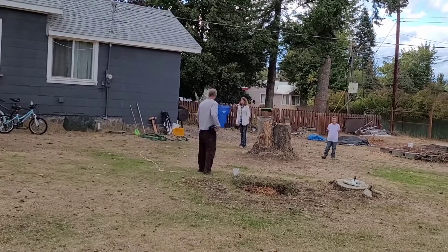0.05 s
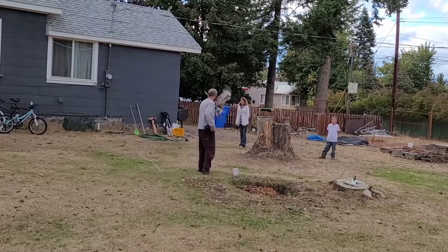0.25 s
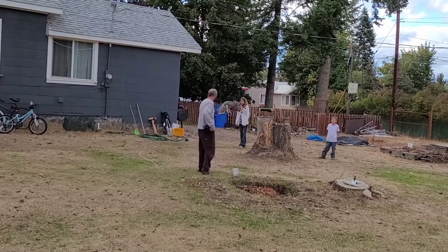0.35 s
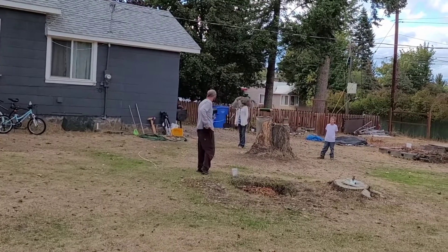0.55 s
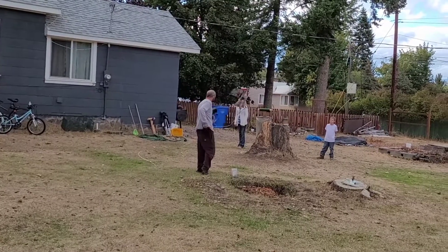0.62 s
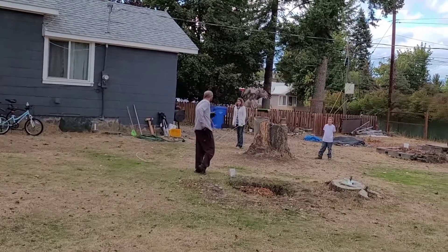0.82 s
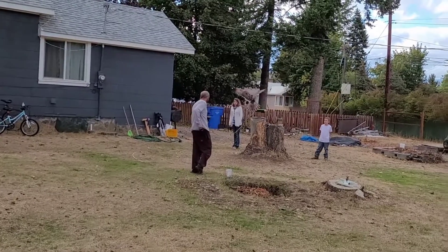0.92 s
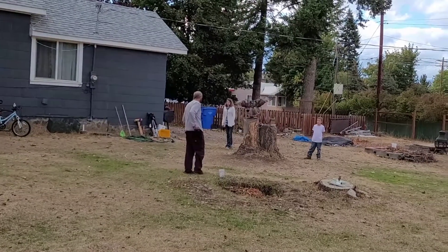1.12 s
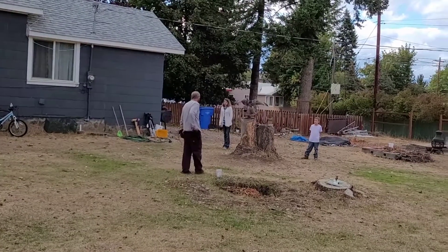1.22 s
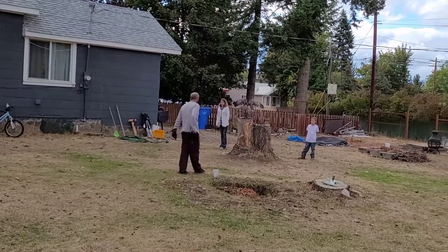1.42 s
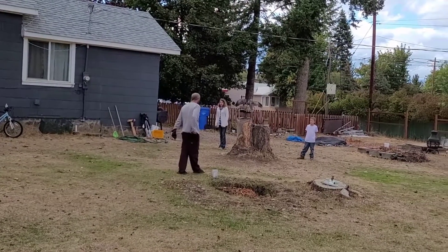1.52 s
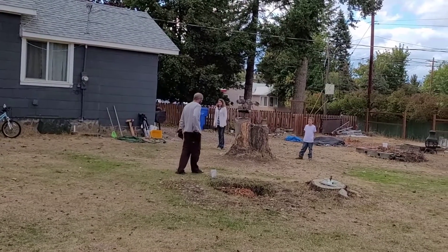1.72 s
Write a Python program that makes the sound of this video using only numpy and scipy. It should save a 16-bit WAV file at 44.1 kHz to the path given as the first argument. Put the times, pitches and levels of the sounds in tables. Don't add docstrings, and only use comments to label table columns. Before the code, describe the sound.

A small jingle bell shaken in the hand outdoors, with one hollow wooden knock near the end

```python
import sys
import numpy as np
from scipy import signal
from scipy.fft import rfft, irfft
from scipy.io import wavfile

SR = 44100
rng = np.random.default_rng(int(sys.argv[2]) if len(sys.argv) > 2 else 0)


def natural_amplitude(level_db):
    exponent = np.asarray(level_db, float) / 20
    return 10 ** exponent


def int16_out(signal):
    q = np.round(np.clip(np.atleast_2d(signal).T, -1, 1) * 32767)
    wavfile.write(sys.argv[1], SR, q.astype(np.int16))


N = 77175

HALVES = np.array([[.5], [-.5]])
BELL_HZ, BELL_LEFT_DB = 2830, 5
RISE_S = 0.0032


def slot_tone():
    # start in seconds, level in dB, ring length in seconds, pitch in Hz, left-right phase in rad.
    early = [(0.2062, -35.6, 0.01, 2870, 0.2), (0.2258, -33.0, 0.0053, 2930, 0.1),
             (0.2595, -29.0, 0.0064, 2850, -0.8), (0.267, -33.3, 0.0066, 2840, -0.4),
             (0.2792, -30.2, 0.0051, 2830, 0.2), (0.2933, -30.4, 0.0039, 2830, -1.7),
             (0.2981, -30.3, 0.0081, 2800, -0.6), (0.3121, -30.2, 0.0054, 2820, 0.1),
             (0.3192, -34.0, 0.0075, 2820, -0.5), (0.3393, -34.1, 0.003, 2890, -0.3),
             (0.3593, -33.8, 0.0056, 2850, -1.9), (0.3707, -30.6, 0.0058, 2850, -2.4),
             (0.3829, -31.3, 0.0028, 2910, -0.0), (0.3915, -28.8, 0.0051, 2830, -2.8),
             (0.407, -31.2, 0.0027, 2890, -3.0), (0.4164, -23.3, 0.0028, 2900, -2.3),
             (0.4207, -22.1, 0.0073, 2870, -0.3), (0.4317, -24.9, 0.0053, 2830, -0.2),
             (0.4538, -22.7, 0.0061, 2830, 1.5), (0.4616, -26.7, 0.0082, 2840, -2.1),
             (0.4773, -26.1, 0.0052, 2820, 0.1), (0.4957, -32.0, 0.0079, 2800, -0.7),
             (0.5095, -28.9, 0.0058, 2850, -2.9), (0.5313, -33.1, 0.0039, 2860, -3.1),
             (0.5856, -29.9, 0.0047, 2820, -0.5), (0.5921, -23.4, 0.0093, 2810, -0.3),
             (0.6073, -26.4, 0.0042, 2830, -0.2), (0.6164, -28.2, 0.0037, 2910, -1.9),
             (0.6228, -24.2, 0.004, 2890, 3.0), (0.6284, -28.6, 0.0076, 2820, 1.5),
             (0.6377, -26.4, 0.0043, 2890, 2.9), (0.6626, -29.1, 0.0076, 2790, -0.4),
             (0.6882, -30, 0.005, 2800, -0.2), (0.6933, -28.7, 0.0029, 2820, 2.5),
             (0.7017, -28.5, 0.0066, 2820, -0.9)]
    # [s, dB, s, Hz, rad].
    late = [(0.7104, -32.9, 0.0032, 2820, 2.2), (0.7185, -28.8, 0.0057, 2830, -3.0),
            (0.7326, -29.7, 0.0056, 2860, 2.8), (0.7721, -27.0, 0.0048, 2780, -0.4),
            (0.7827, -32.1, 0.0086, 2760, -0.8), (0.7922, -31.9, 0.0064, 2850, -3.1),
            (0.8001, -25.9, 0.0057, 2780, 2.7), (0.8081, -29.8, 0.005, 2890, -3.0),
            (0.8334, -29.9, 0.0047, 2860, 2.8), (0.8427, -32.9, 0.0038, 2900, -3.1),
            (0.9274, -34.7, 0.0052, 2870, 0.3), (0.9537, -27.1, 0.009, 2820, 1.3),
            (0.9736, -32.6, 0.0056, 2780, 1.7), (0.9809, -28.9, 0.007, 2810, 2.5),
            (0.9994, -28.9, 0.0076, 2820, -0.2), (1.017, -27.6, 0.0106, 2780, -0.9),
            (1.0444, -27.6, 0.0161, 2810, 2.8), (1.1019, -32.6, 0.0057, 2830, -0.3),
            (1.1273, -25.7, 0.0112, 2840, 1.3), (1.151, -31, 0.011, 2830, 0.9),
            (1.1722, -32.6, 0.0099, 2810, -0.0), (1.1973, -29.7, 0.0074, 2840, 2.4),
            (1.2305, -29.1, 0.0075, 2850, -0.4), (1.2493, -22.3, 0.0066, 2830, -0.4),
            (1.2753, -30.8, 0.0059, 2830, 3.1), (1.3317, -33.4, 0.0078, 2820, -0.3),
            (1.3486, -24.5, 0.0087, 2830, -0.3), (1.3596, -32.6, 0.0063, 2820, -1.0),
            (1.3751, -31.3, 0.0042, 2860, -3.1), (1.4248, -30.0, 0.011, 2870, -0.5),
            (1.4513, -36.5, 0.0083, 2880, 0.5), (1.4978, -35.7, 0.0059, 2850, -0.7),
            (1.5505, -38.9, 0.0045, 2850, -0.3), (1.5671, -40.3, 0.0042, 2870, -0.3),
            (1.6638, -45, 0.005, 2840, 0)]
    # [s, dB, s, Hz, rad].
    faint = [(0.446, -27.5, 0.0084, 2860, 0.2), (0.547, -39.5, 0.0045, 2980, 0.24),
             (1.414, -41, 0.021, 2863, 0.2), (1.528, -44.5, 0.0058, 2857, 0.29),
             (1.6331, -42, 0.005, 2814, 0.23), (1.6548, -43, 0.0048, 2874, 0.18)]
    twin_hz, twin_spread_hz, twin_db, twin_t60_s = 200, 210, -8.5, 0.025
    sag_db, damp_t60_s = -4, 0.03
    strikes = early + late + faint
    out, t = np.zeros((2, N)), np.arange(3000) / SR
    luck = rng.uniform(-0.92, 1, (len(strikes), 4))
    for (s, db, length, hz, turn), (phase, pan, apart, twin_phase) in zip(strikes, luck):
        hold = length * 0.8
        swell = np.sin(np.pi / 2 * np.minimum(t / RISE_S, 1)) ** 2
        damping_db = 60 * np.maximum(t - hold - RISE_S / 2, 0) / damp_t60_s
        shape = swell * natural_amplitude(sag_db * t / hold - damping_db)
        facing = turn * HALVES
        twin_mode = (hz + twin_hz + twin_spread_hz * apart, twin_db, twin_t60_s)
        twin = ring([twin_mode], t, np.pi * twin_phase - facing)
        tone = np.sin(2 * np.pi * hz * t + np.pi * phase + facing) + twin
        add(out, s - RISE_S / 2, natural_amplitude(db + 1.0) * sides(BELL_LEFT_DB + 4.4 * pan) * shape * tone)
    return out


def rolling():
    # frequency in Hz, level in dB.
    clatter = [(3400, 16), (5000, -17.5), (7500, -4), (9000, -49), (12500, 0.5), (15500, -41.5)]
    roll_db, roll_width_hz, roll_per_s = -4, 170, 400
    clatter_db, clatter_follow = -73, 0.58
    taps = clicks(roll_per_s, spread_db=0.0)
    hum = resonate(taps, BELL_HZ * swing(0.97), roll_width_hz)
    tone = natural_amplitude(roll_db + effort(axis=1)) * sides(BELL_LEFT_DB) * hum
    grit = signal.lfilter([1], [1, -0.98], abs(taps)) * 0.057 + 1
    noise = grit * rng.standard_normal((2, N))
    dry_noise = evened(colour(noise, lambda hz: read([(500, -58.5)] + clatter, hz)))
    return tone + natural_amplitude(clatter_db + clatter_follow * (effort(axis=2) + 86)) * dry_noise


def shell():
    # frequency in Hz, level when tumbled in dB, level when struck in dB, left-right phase in rad.
    shell_modes = [
        (5980, 7, -3, -2.4),
        (6150, 0, -1, -1.5),
        (9980, 5, -6.5, 1.45),
        (10870, -2, -4, 1.5),
        (15450, -14, -26, 0),
    ]
    # start in seconds, level in dB.
    rim_hits = [(0.227, -70.5), (0.448, -76), (0.606, -77), (0.7689, -76.5), (1.071, -76.5), (1.2593, -69),
                (1.2888, -65.5)]
    # start in seconds, level in dB.
    top_hits = [(.603, -71), (.666, -74), (.769, -66)]
    tumble_per_s, width_hz, t60_s, hit_spread_db = 110, 95, 0.5, 6
    out, t = np.zeros((2, N)), np.arange(SR // 2) / SR
    drift = swing(0.3)
    luck = rng.uniform(-1, 1, (len(rim_hits), len(shell_modes), 3))
    for k, (hz, tumbled_db, struck_db, lag) in enumerate(shell_modes):
        taps = clicks(tumble_per_s, spread_db=3.5)
        flicker = resonate(taps, hz * drift, width_hz * hz / 8000, lag * HALVES)
        out += natural_amplitude(tumbled_db + effort(axis=2)) * flicker
        for (s, db), (size, phase, tune) in zip(rim_hits, luck[:, k]):
            hit_hz = hz * drift[round(s * SR)] * (1 + 0.0015 * tune)
            mode = (hit_hz, db + struck_db + hit_spread_db * size, t60_s)
            add(out, s, np.minimum(t / 0.003, 1) * ring([mode], t, np.pi * phase + lag * HALVES))
    top_hz = shell_modes[-1][0]
    for s, db in top_hits:
        add(out, s, np.minimum(t / RISE_S, 1) * ring([(top_hz, db, 0.15)], t)[None])
    return out


def ticks():
    # start in seconds, level in dB.
    tick_times = [(0.1608, -54.5), (0.1766, -60), (0.1989, -59.5), (0.3787, -56.5), (0.4195, -56),
                  (0.5835, -52.5), (0.5913, -54.5), (1.228, -56.5), (1.2486, -47.5), (1.3475, -54.5)]
    t60_s, tilt_db = 0.022, -16
    out, t = np.zeros((2, N)), np.arange(1024) / SR
    for s, db in tick_times:
        noise = rng.standard_normal((3, 1024))
        noise = noise[:1] + 1.8 * noise[1:]
        snap = evened(colour(noise, lambda hz: tilt_db * abs(np.log2((hz + 50) / 3500))))
        add(out, s, np.minimum(t / 0.0015, 1) * natural_amplitude(db + 2.5 - 60 * t / t60_s) * snap)
    return out


def knock():
    # start in seconds, level in dB, brightness in dB, left-right difference in dB.
    knocks = [
        (1.16, -19, -1, 2.5),
        (1.167, -37.5, -4.5, -7.5),
        (1.1864, -34.5, -0.5, -3.5),
        (1.203, -36.5, 8.5, 7),
        (1.2363, -44, -11, 7),
        (1.2909, -45, 4, -6.5),
    ]
    # frequency in Hz, level in dB, T60 in seconds.
    wood = [
        (115.6, -25.5, 0.12),
        (826, -17.5, 0.024),
        (1313, -1.5, 0.025),
        (1900, -6, 0.0064),
    ]
    # frequency in Hz, level in dB, T60 in seconds.
    wood_crack = [(3227, -2.5, 0.011), (4100, -26, 0.014), (5070, -20, 0.0085), (6896, -33.5, 0.019),
                  (9960, -25.5, 0.013)]
    tail_db, tail_t60_s, tail_hz, tail_width_hz = -44, 0.62, 1290, 240
    out, t = np.zeros((2, N)), np.arange(SR // 3) / SR
    for s, db, bright_db, pan_db in knocks:
        crack = ring(wood_crack, t) + natural_amplitude(-23.5 - 60 * t / 0.032) * rng.standard_normal((2, len(t)))
        blow = ring(wood, t, 0.37 * HALVES) + natural_amplitude(bright_db) * crack
        add(out, s, np.minimum(t / 0.0013, 1) ** 2 * natural_amplitude(db + 4.0) * sides(pan_db) * blow)
    tail = resonate(rng.standard_normal((2, len(t))), tail_hz, tail_width_hz)
    add(out, knocks[0][0], np.minimum(t / 0.023, 1) * natural_amplitude(tail_db - 60 * t / tail_t60_s) * tail)
    return out


def scuffs():
    # start in seconds, length in seconds, level in dB, left-right difference in dB, brightness in dB per octave.
    rubs = [(0.051, 0.00503, -71, -8, 6), (0.0888, 0.0041, -53, -19, 5.5), (0.0913, 0.015, -47, -8.5, 0),
            (0.152, 0.039, -63, 6, 1), (0.364, 0.028, -59, 2.5, -11), (0.57, 0.074, -69.5, -10, 13.5),
            (1.066, 0.0052, -70, -13.5, 30.5), (1.223, 0.031, -66, -11.5, 6), (1.611, 0.069, -69.5, 9, 1.5),
            (1.695, 0.075, -63, 7, -0.5)]
    # frequency in Hz, level in dB.
    cloth = [(600, -36), (1100, -5), (2290, 5.5), (3900, -3.5), (5500, -30), (7100, -17.5), (12000, -57.5)]
    out = np.zeros((2, N))
    for s, length, db, pan_db, tilt_db in rubs:
        grit = rng.standard_normal((3, 4096)) * natural_amplitude(2 * rng.exponential(1, 4096))
        grit = grit[:1] + 0.31 * grit[1:]
        grit = evened(colour(grit, lambda hz: read(cloth, hz) + tilt_db * np.log2((hz + 50) / 2500)))
        u = np.minimum(np.arange(4096) / SR / length, 1)
        add(out, s, natural_amplitude(db) * sides(pan_db) * np.sin(np.pi * u) ** 0.59 * (u < 1) * grit)
    return out


def thumps():
    # start in seconds, level in dB, pitch in Hz.
    bumps = [
        (0.366, -48, 190),
        (.37, -58, 680),
        (0.403, -45, 195),
    ]
    length_s = 0.023
    out, t = np.zeros((2, N)), np.arange(0, length_s, 1 / SR)
    for s, db, hz in bumps:
        add(out, s, natural_amplitude(db) * np.sin(np.pi * t / length_s) ** 2 * np.sin(2 * np.pi * hz * t)[None])
    return out


def yard(x):
    level_db, t60_s = -15, 0.25
    t = np.arange(SR // 4) / SR
    hits = (rng.random((2, len(t))) < 0.03) * (t > 0.008)
    taps = rng.choice([-1, 1], (2, len(t))) * hits * natural_amplitude(-60 * t / t60_s)
    return natural_amplitude(level_db) * signal.fftconvolve(x, taps / np.linalg.norm(taps[0]), axes=1)[:, :N]


def air():
    # frequency in Hz, level in dB.
    air_colour = [(20, -22), (60, 1.5), (250, -10.5), (750, -11.5), (1800, -22.5), (2600, -44),
                  (15600, -56)]
    # frequency in Hz, left-right likeness as a ratio.
    likeness = [(60, 0.94), (150, 0.85), (300, 0.69), (700, 0.073), (2000, 0.048)]
    # frequency in Hz, level in dB, width in Hz.
    hum_bands = [
        (75.7, -67.5, 15),
        (114.3, -63.5, 20),
        (365, -73.5, 61),
    ]
    a, b = rfft(rng.standard_normal((2, N)))
    hz = np.fft.rfftfreq(N, 1 / SR)
    same = np.clip(read(likeness, hz), -1, 1)
    pair = np.array([a, same * a + np.sqrt(1 - same ** 2) * b])
    wash = irfft(pair * natural_amplitude(read(air_colour, hz)), N)
    hums = sum(natural_amplitude(db) * resonate(rng.standard_normal(N), f, width_hz) for f, db, width_hz in hum_bands)
    return natural_amplitude(-58.5) * evened(wash) + hums


def swing(share):
    # time in seconds, pitch in Hz.
    drift_points = [(.2, 2865), (0.501, 2850), (.79, 2799), (0.999, 2829), (1.501, 2884)]
    return (np.interp(np.arange(N) / SR, *np.transpose(drift_points)) / BELL_HZ) ** share


def effort(axis):
    # time in seconds, level of the rolling pea in dB, level of the pea tumbling against the rim in dB.
    shake = np.array([(0.081, -78, -112), (.2, -54.5, -104), (.26, -37, -76), (0.347, -45.5, -81.5),
                      (0.449, -37, -66.5), (0.543, -44.5, -89), (0.599, -33.5, -72), (0.738, -41.5, -75),
                      (0.782, -37.5, -72.5), (0.891, -45, -97.5), (1.019, -38.5, -75), (1.079, -49, -82.5),
                      (1.2, -39.5, -76), (1.3, -39.5, -78), (1.562, -51.5, -104), (1.74, -62.5, -110)])
    return np.interp(np.arange(N) / SR, shake[:, 0], shake[:, axis])


def clicks(per_s, spread_db):
    size = natural_amplitude(spread_db * np.minimum(rng.exponential(1, (2, N)), 5)) * rng.choice([-1, 1], (2, N))
    train = size * (rng.random((2, N)) < per_s / SR)
    return evened(train + 0.28 * train[::-1])


def ring(modes, t, phase=0):
    return sum(natural_amplitude(db - 60 * t / t60) * np.sin(2 * np.pi * hz * t + phase) for hz, db, t60 in modes)


def resonate(x, hz, width_hz, lag=0):
    turn = np.exp(2j * np.pi * np.cumsum(hz * np.ones(x.shape[-1])) / SR)
    r = np.exp(-np.pi * width_hz / SR)
    smooth = signal.lfilter([1], [1, -2 * r, r * r], x / turn)
    return evened((turn * np.exp(1j * lag) * smooth).real)


def colour(x, gain_db):
    gain = natural_amplitude(gain_db(np.fft.rfftfreq(x.shape[-1], 1 / SR)))
    return irfft(rfft(x) * gain, x.shape[-1])


def read(points, hz):
    f, value = np.transpose(points)
    return np.interp(np.log(hz + 1), np.log(f + 1), value)


def evened(x):
    return x / np.sqrt(np.mean(x ** 2) + 1e-20)


def sides(pan_db):
    return natural_amplitude(np.array([[pan_db / 2], [-pan_db / 2]]))


def add(mix, s, sound):
    part = mix[:, round(s * SR):][:, :sound.shape[-1]]
    part += sound[..., :part.shape[1]]


def scene():
    bell = slot_tone() + rolling() + shell() + ticks()
    near = bell + knock() + scuffs() + thumps()
    return near + yard(near) + air()


def top_cut(x):
    return signal.sosfilt(signal.butter(12, 15710, fs=SR, output="sos"), x)


def record(dry):
    low_pass = signal.firwin(511, 15750, window=("kaiser", 9), fs=SR)
    cut = signal.oaconvolve(dry, low_pass[None], "same")
    return top_cut(cut)


dry = scene()
out = record(dry)
int16_out(out)
```